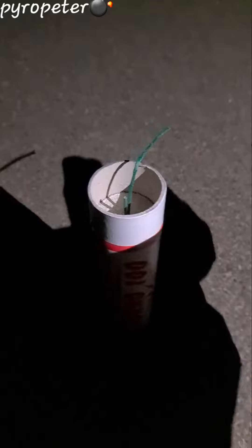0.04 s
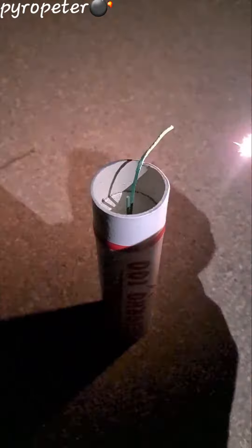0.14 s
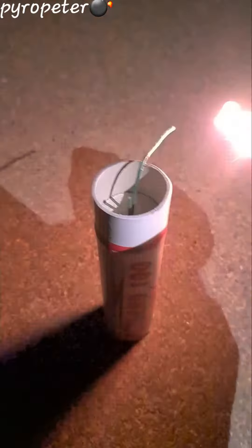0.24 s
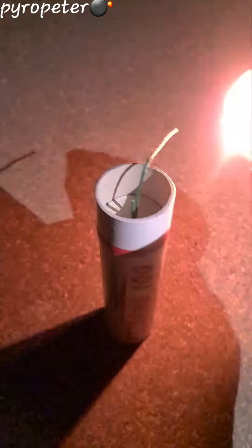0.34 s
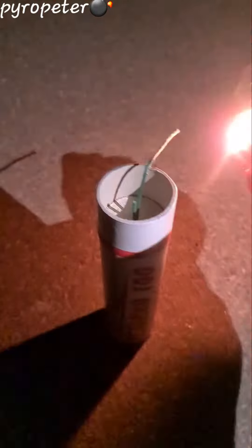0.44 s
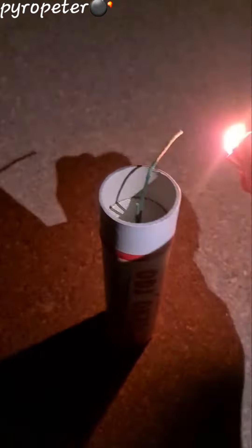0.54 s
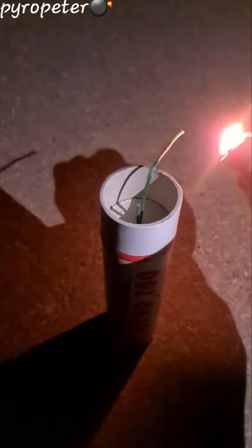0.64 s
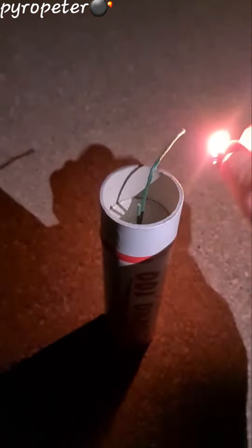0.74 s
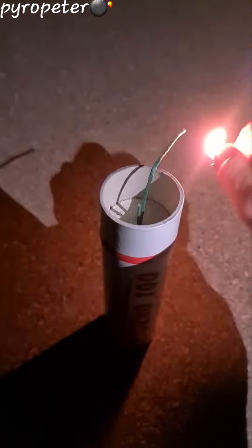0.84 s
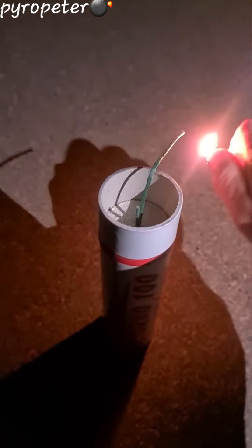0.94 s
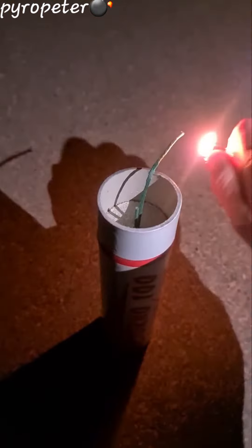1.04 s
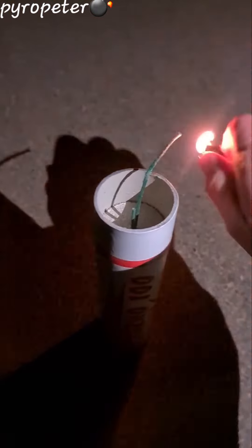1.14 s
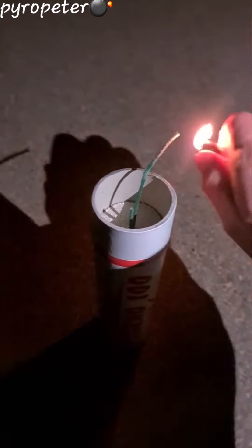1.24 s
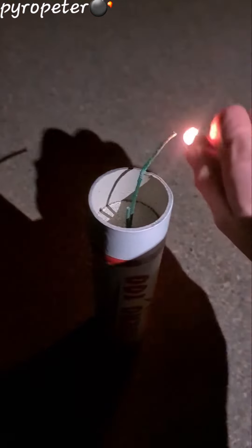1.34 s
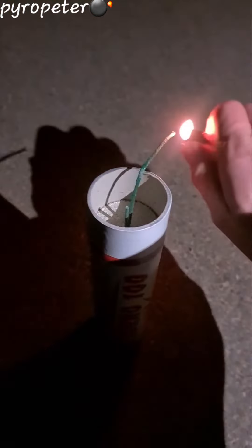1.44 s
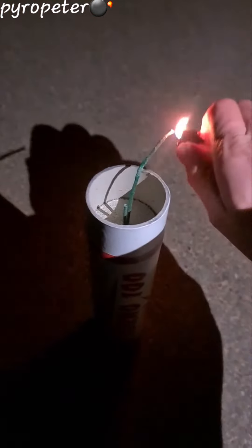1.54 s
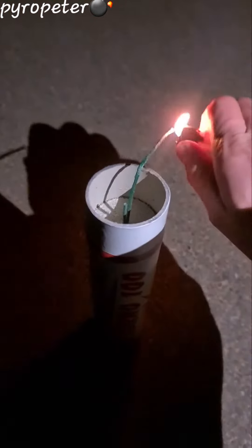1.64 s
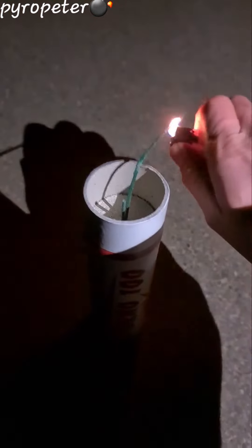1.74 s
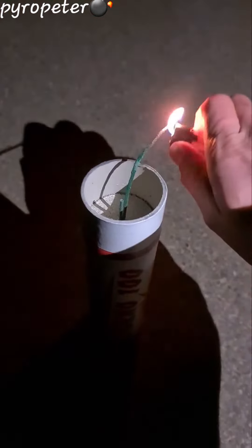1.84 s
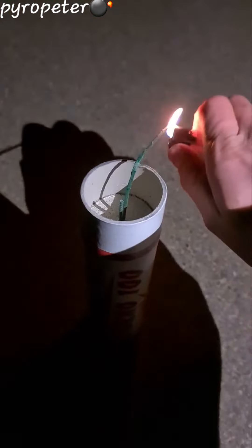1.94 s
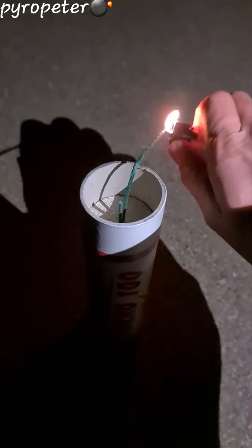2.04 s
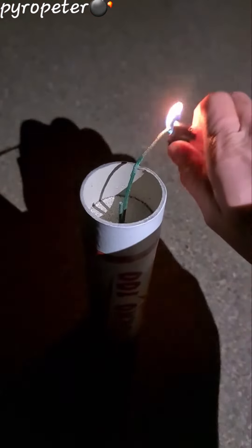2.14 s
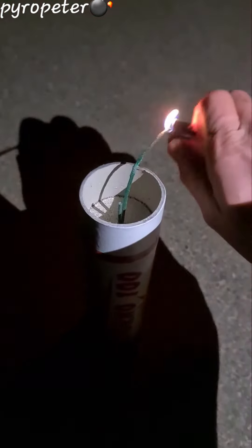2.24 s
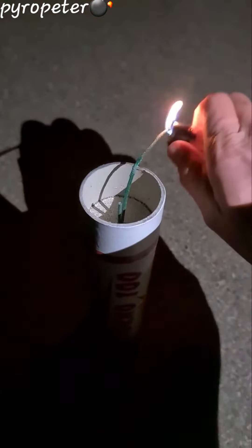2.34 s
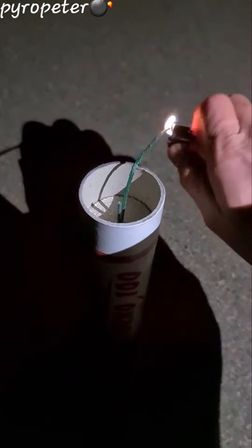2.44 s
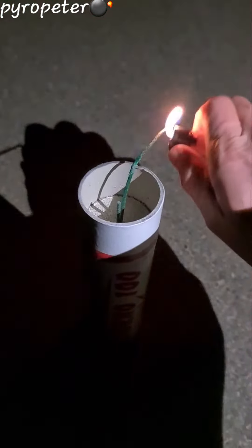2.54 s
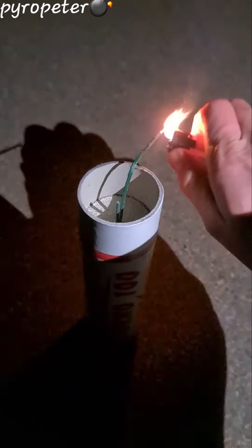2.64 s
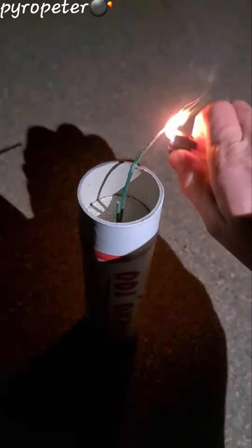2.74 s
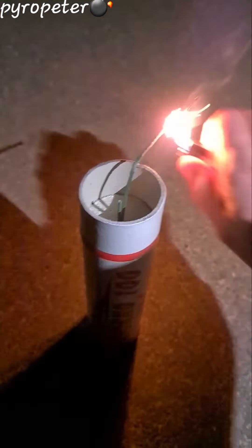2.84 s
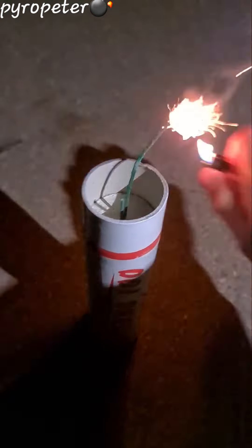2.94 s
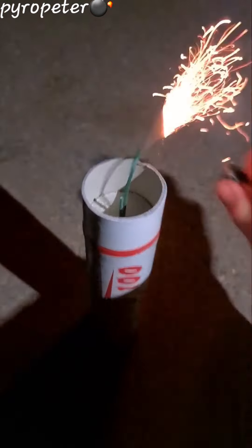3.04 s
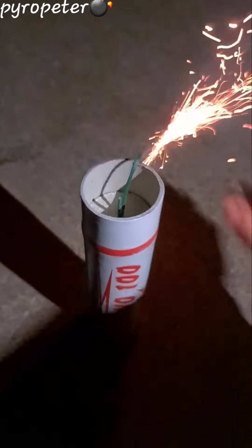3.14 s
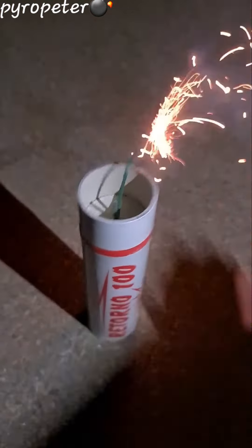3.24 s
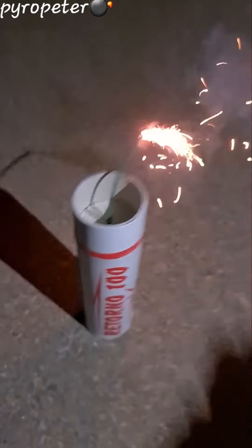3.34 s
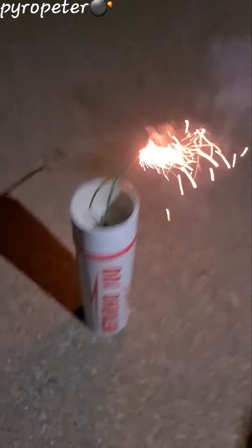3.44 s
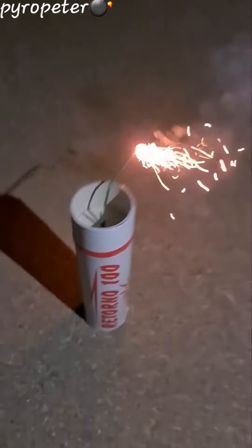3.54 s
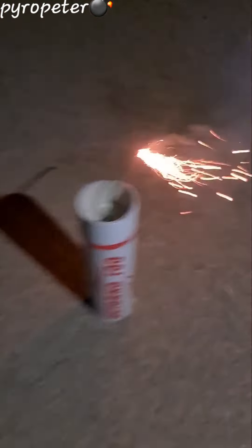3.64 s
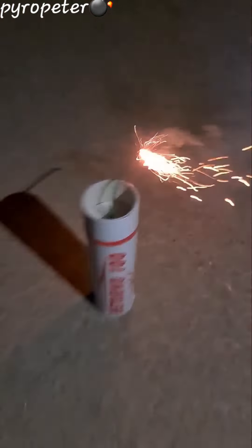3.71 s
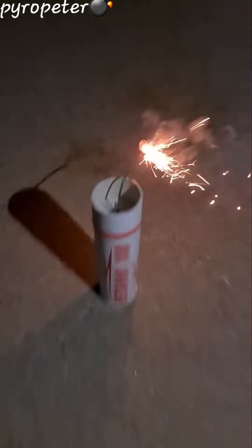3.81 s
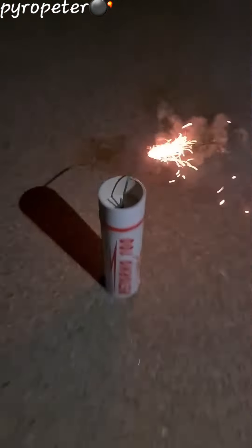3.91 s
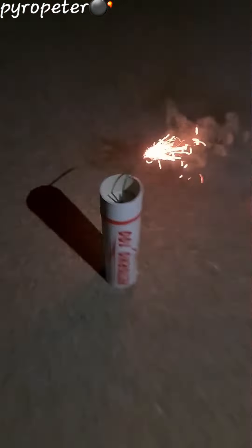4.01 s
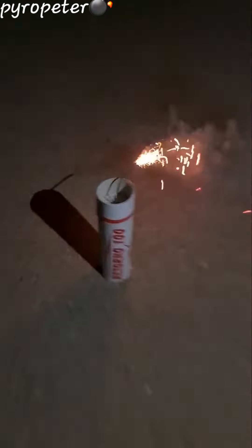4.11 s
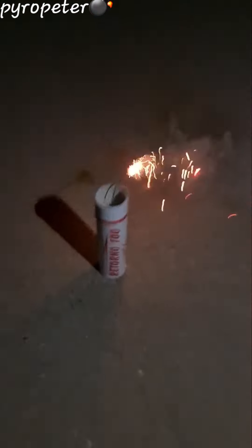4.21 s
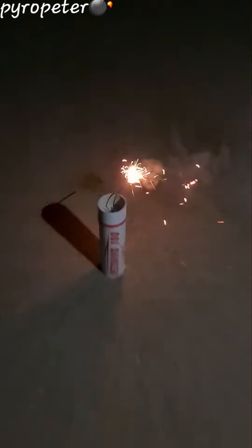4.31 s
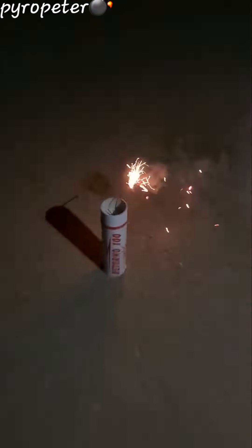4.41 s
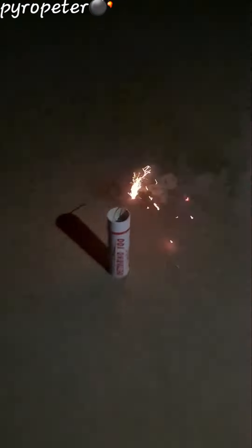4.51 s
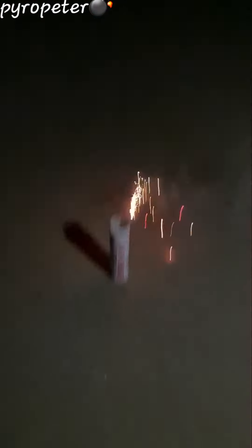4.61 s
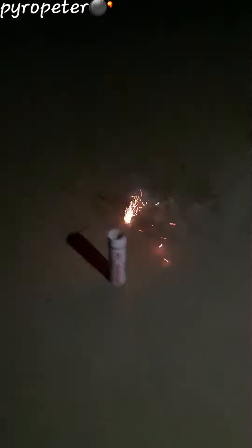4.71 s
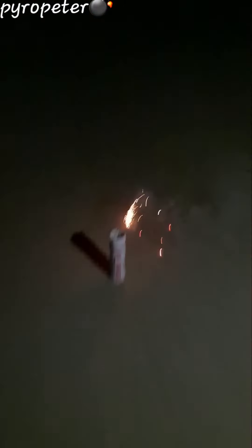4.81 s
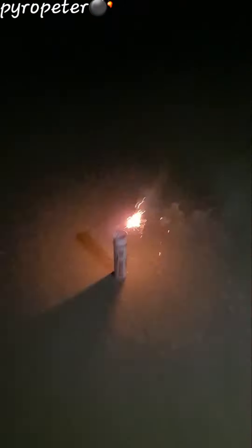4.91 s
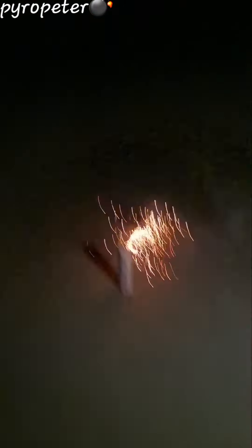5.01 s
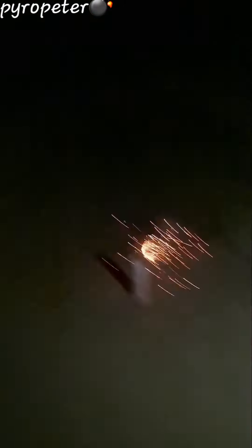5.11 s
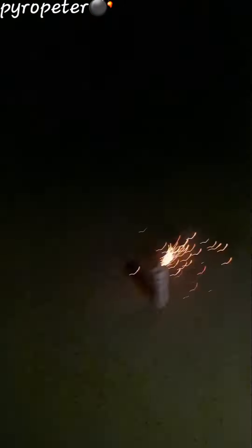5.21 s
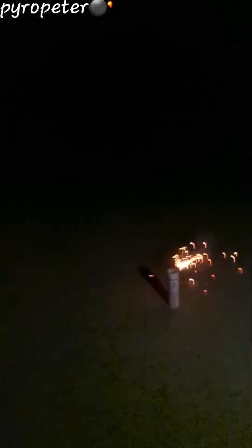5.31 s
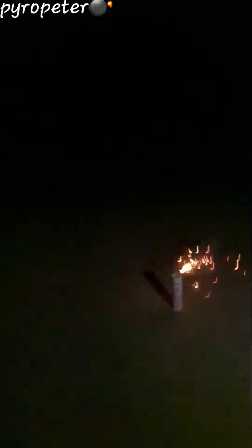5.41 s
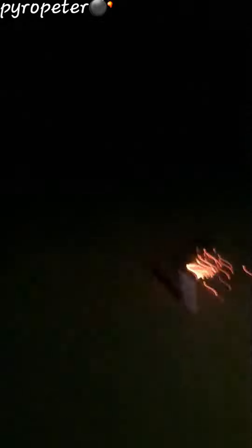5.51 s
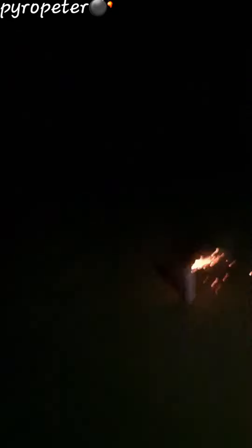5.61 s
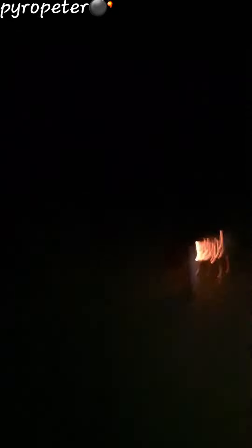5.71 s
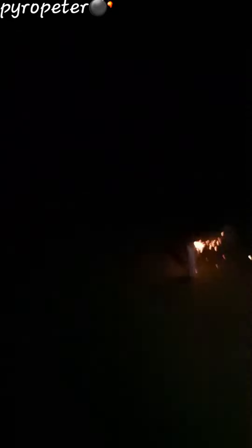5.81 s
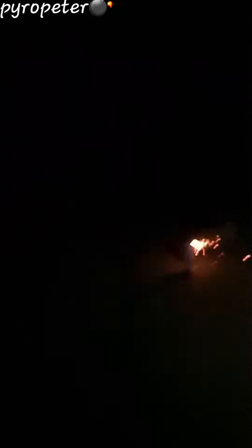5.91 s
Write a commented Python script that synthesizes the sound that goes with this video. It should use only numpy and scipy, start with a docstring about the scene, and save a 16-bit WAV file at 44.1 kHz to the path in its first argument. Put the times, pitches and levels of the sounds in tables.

```python
"""Outdoors at night a lighter is struck and held to a fuse, which catches, flares and hisses while the
listener backs away: fingers knock the hand-held microphone, shoes scuff, an engine idles far off.
Fuse, lighter, handling and steps are shaped noise, knocks are damped rings, the engine is a sum of sines.
Playback speeds up steadily, so the engine's pitch and the top edge of the sound climb."""
import sys
import numpy as np
from scipy import signal
from scipy.fft import rfft, irfft
from scipy.io import wavfile
from scipy.ndimage import uniform_filter1d

SR = 44100
rng = np.random.default_rng(int(sys.argv[2]) if len(sys.argv) > 2 else 0)


def to_wav(sig):
    """Store sig (one row per channel, or 1-D mono) as 16-bit WAV at the path in sys.argv[1].

    Samples outside -1..1 are clipped; the rate is SR.
    """
    pcm = np.clip(np.atleast_2d(sig), -1, 1) * 32767
    pcm = np.round(pcm).astype(np.int16)
    wavfile.write(sys.argv[1], SR, pcm.T)  # frames by channels


def amplitude_ratio(level_db):
    """Convert a level in decibels to the matching linear amplitude (field) ratio."""
    exponent = np.asarray(level_db, float) / 20
    return 10 ** exponent


N = 262953

# upper edge of the sound, climbing with playback speed: start_s, edge_hz
PLAYBACK_EDGE = [(0, 9760), (.8, 10060), (1.6, 10620), (2.4, 11240), (3.2, 11800), (4.0, 12420),
                 (4.8, 12760), (5.96, 13060)]


def rms_one(x):
    """Scales to unit power."""
    return x / np.sqrt(np.mean(x ** 2) + 1e-20)


def in_time(rows):
    """Each column of a curve table at every sample."""
    s, *columns = np.transpose(rows)
    return [np.interp(np.arange(N) / SR, s, column) for column in columns]


def drift(corner_hz):
    """Slow chance: noise low-passed twice at a fortieth of the sample rate, spread 1."""
    pole = np.exp(-2 * np.pi * corner_hz * 40 / SR)
    noise = rng.standard_normal(N // 40 + 2002)
    slow = signal.lfilter([1], [1, -2 * pole, pole * pole], noise)[2000:]
    return np.interp(np.arange(N) / 40, np.arange(len(slow)), rms_one(slow))


def coloured(x, spectrum):
    """Gives a broadband excitation the spectrum of a table; rms 1."""
    hz, db = np.transpose(spectrum)
    bins_hz = np.arange(N // 2 + 1) * SR / N + 1
    gain = amplitude_ratio(np.interp(np.log(bins_hz), np.log(hz), db))
    return rms_one(irfft(rfft(x) * gain, N))


def band(x, low_hz, high_hz):
    """Gentle band-pass."""
    edges = np.clip([low_hz, high_hz], 20, SR / 2.1)
    return signal.sosfilt(signal.butter(2, edges, "band", fs=SR, output="sos"), x)


def reshaped(x, gain):
    """Short-time spectra times gain(Hz, s)."""
    size = 1024
    overlap = size * 3 // 4
    hz, s, frames = signal.stft(x, SR, nperseg=size, noverlap=overlap)
    return signal.istft(frames * gain(hz[:, None], s), SR, nperseg=size, noverlap=overlap)[1][:N]


def swell(s, rise_s, t60_s):
    """Exponential rise to a peak at s = 0, then decay by 60 dB in t60_s."""
    rising = np.exp(np.minimum(s, 0) / rise_s)
    falling = amplitude_ratio(-60 * np.maximum(s, 0) / t60_s)
    return np.where(s < 0, rising, falling)


def grit(rows, grain_db):
    """Grainy noise in a band that swells to its peak and dies.

    Rows hold peak_s, level_db, centre_hz, width_octaves, rise_s, t60_s."""
    half = SR // 3
    out, t = np.zeros(N + 2 * half), np.arange(-half, half) / SR
    for peak_s, db, hz, octaves, rise_s, t60_s in rows:
        grains = np.repeat(rng.standard_normal(half // 20 + 1), 40)[:2 * half]
        noise = rng.standard_normal(2 * half) * amplitude_ratio(grain_db * grains)
        edges = hz * 2 ** (-octaves / 2), hz * 2 ** (octaves / 2)
        noise = rms_one(band(band(noise, *edges), *edges))
        at = round(peak_s * SR)
        out[at:at + 2 * half] += amplitude_ratio(db) * swell(t, rise_s, t60_s) * noise
    return out[half:half + N]


def fuse(sparks_per_s=2500, spread_db=4.0, sputter_db=0.62, spark_share=0.21):
    """A gas jet sputters and powder grains spit: hiss mixed with random clicks of either sign."""
    # burning fuse, a first spurt, a lull, the flare and the long burn: start_s, level_db
    burn = [(2.895, -63), (2.909, -43.5), (2.96, -43), (2.997, -40.5), (3.01, -48), (3.033, -57),
            (3.038, -43), (3.055, -51.5), (3.062, -62), (3.11, -52), (3.116, -42.5), (3.2, -34.5),
            (3.265, -31), (3.316, -22), (3.34, -27), (3.45, -31.5), (3.75, -34), (3.88, -31.5), (4.05, -35),
            (4.16, -36), (4.21, -32), (4.27, -34.5), (4.4, -33.5), (4.55, -36), (5.1, -40), (5.26, -37.5),
            (5.45, -40.5), (5.8, -43.5), (5.96, -41)]
    sizes = amplitude_ratio(spread_db * np.minimum(rng.exponential(1, N), 5)) * rng.choice([-1, 1], N)
    chance = sparks_per_s * amplitude_ratio(4 * drift(15.0)) / SR
    sparks = rms_one(sizes * (rng.random(N) < chance))
    jet = rms_one(rng.standard_normal(N) + spark_share * sparks)
    lit = np.arange(N) > burn[0][0] * SR
    return lit * amplitude_ratio(in_time(burn)[0] + sputter_db * drift(39.0)) * reshaped(jet, fuse_colour)


def fuse_colour(hz, s, flicker=0.11, patchy_db=2.0):
    """Jet colour and tube rings, blended by distance and heard thinner near 6 kHz; equal power per frame."""
    # relative colour of the jet: pitch_hz, near_db, far_db
    jet_colour = [(200, -39, -44), (438, -11.5, -12.5), (690, -10, 0), (1300, -15, -6.5), (1620, -2.5, -8),
                  (3000, -9, -10), (4280, -11, -12), (6230, -11, -13), (8180, -7.5, -10), (9600, -10, -9.5),
                  (11860, -22, -12), (14200, -22.5, -16)]
    # the paper tube below rings along: pitch_hz, width_hz, near_lift_db, far_lift_db
    tube_rings = [(710, 220, 7, 5), (1290, 200, -5, -1), (1790, 120, 9, 2), (2100, 80, 7, 4),
                  (2460, 130, 9, 11), (3050, 100, 4, 4), (3700, 140, 10, 11), (4750, 200, 4, 1),
                  (5200, 150, 4, 1), (7630, 150, 5, 3), (9310, 180, 6, 3)]
    # the rings change: start_s, pitch ratio of all but the lowest, strength of all (0-1)
    ring_drift = [(3.7, 1., 1.), (4.0, 1.04, 1.), (4.25, 1.07, 1.), (4.5, 1.1, .9), (4.8, 1.14, .4),
                  (5.3, 1.16, .2)]
    # the fuse's treble, in full from 8 kHz: start_s, lift_db
    treble = [(2.9, -8.5), (3.12, -4), (3.2, 4.5), (3.6, 2.5), (3.85, 0.5), (4.05, 4), (4.4, 0), (4.55, 3),
              (5.0, -1.3), (5.96, -2.5)]
    # the low roar against the hiss, in full below 1 kHz: start_s, lift_db
    roar = [(2.91, 1), (3.0, -3), (3.15, -2), (3.3, 2), (3.7, 1.9), (4.2, 2), (4.35, -3.3), (4.7, 3),
            (4.95, -6.5), (5.2, 0.5), (5.96, -8)]
    # one hears the band near 6 kHz thinned, more so around these times: centre_s, extra_db
    thinner_moments = [(4.13, -5), (4.8, -5)]
    thinned_db, moment_width_s = -3, 0.12
    retreat_start_s, retreat_s = 2.89, 1.36   # stepping back, from near colour to far colour
    flare_s, flare_width_s = 3.31, 0.062      # the flare has the near colour

    retreat = np.clip((s - retreat_start_s) / retreat_s, 0, 1) ** 0.89
    far = retreat * (1 - np.exp(-((s - flare_s) / flare_width_s) ** 2))
    at_hz, near_db, far_db = np.transpose(jet_colour)
    db = (1 - far) * np.interp(hz, at_hz, near_db) + far * np.interp(hz, at_hz, far_db)
    db = db + np.interp(s, *np.transpose(treble)) * np.interp(hz, [4000, 8000], [0, 1])
    db = db + np.interp(s, *np.transpose(roar)) * np.interp(hz, [1000, 1400], [1, 0])

    extra_db = sum(moment_db * np.exp(-((s - centre_s) / moment_width_s) ** 2)
                   for centre_s, moment_db in thinner_moments)
    db = db + (thinned_db + extra_db) * np.interp(hz, [4000, 5400, 6800, 7600], [0, 1, 1, 0])

    # clumps of powder burn unevenly
    clumps = uniform_filter1d(rng.standard_normal(db.shape), size=14, axis=0)
    clumps = uniform_filter1d(clumps, size=8, axis=1)
    db = db + patchy_db * rms_one(clumps)

    times, ratio, strength = np.transpose(ring_drift)
    ratio, strength = np.interp(s, times, ratio), np.interp(s, times, strength)
    frames = np.minimum(s * SR, N - 1).astype(int)
    for k, (ring_hz, width_hz, near_lift, far_lift) in enumerate(tube_rings):
        centre_hz = ring_hz * (ratio if k else 1)   # the lowest ring stays put
        waver = 1 + flicker * drift(12.4)[frames]   # the jet wags past the mouth
        lift_db = waver * strength * ((1 - far) * near_lift + far * far_lift)
        db = db + lift_db / (1 + (2 * (hz - centre_hz) / width_hz) ** 2)
    return amplitude_ratio(db) / np.sqrt(np.mean(amplitude_ratio(2 * db), axis=0))


def lighter():
    """Wheel scrapes flint and the lever snaps: bursts coloured by the small metal parts."""
    # bursts of the strike: peak_s, level_db (rms at the peak), t60_s
    bursts = [(.448, -51.5, 0.25), (.503, -40, 0.18), (.519, -45, .086), (.558, -29.5, 0.066),
              (.566, -18.5, 0.035), (.573, -32.5, .033), (.59, -48, 0.13)]
    # relative colour of the metal parts: pitch_hz, level_db
    metal_colour = [(290, -46), (500, -17.5), (691, -10.5), (876, -21), (1290, -12), (1920, 3.5),
                    (2370, -15), (2680, 5), (3850, -13), (4590, -6.5), (5670, -9), (8340, -6), (9800, -19),
                    (12700, -51), (21600, -120)]
    s = np.arange(N) / SR
    envelope = sum(amplitude_ratio(db) * swell(s - peak_s, 0.0051, t60_s) for peak_s, db, t60_s in bursts)
    scrape = rng.standard_normal(N) * amplitude_ratio(1.3 * drift(120.0))      # teeth bite the flint unevenly
    # level treble in place of the two steep last rows
    return envelope * coloured(scrape, metal_colour[:-2] + [(15000, -18.5)])


def ticks():
    """Small ticks of the lighter in the hand and the first sparks: very short noise bursts."""
    # peak_s, level_db (rms at the peak), centre_hz, width_octaves
    tick_rows = [(.377, -54, 900, 1.7), (.619, -45, 3000, 4.7), (.662, -44, 6000, 2.4),
                 (.672, -52, 5000, 2.3), (.722, -39, 8000, 3.9), (.91, -55, 2500, 1.5),
                 (1.136, -49, 1180, 1.8), (1.604, -46, 1300, 3.1), (1.676, -50, 1880, 0.94),
                 (1.754, -55, 1630, 0.45), (1.81, -45, 1400, 2.5), (1.823, -48, 2770, 0.79),
                 (1.909, -48.5, 1190, 3.1), (2.868, -42.5, 3470, 2.7), (3.022, -42, 3000, 3),
                 (3.078, -49, 4000, 2.7)]
    rise_s, t60_s = 0.00059, 0.02
    return grit([(*row, rise_s, t60_s) for row in tick_rows], grain_db=0.5)


def knocks(offset_s=0.00354, snap=1.0):
    """Each finger knock pushes the casing either way; it rings a few cycles with a sharper onset."""
    # start_s (counted from offset_s into the sound), peak_db (before the band-pass), pitch_hz
    knock_rows = [(0.118, -28.5, 355), (0.218, -50, 352), (0.274, -25, 393), (0.373, -34.5, 330),
                  (0.423, -37.5, 291), (0.623, -38.5, 153), (0.649, -36, 497), (1.673, -41, 427),
                  (3.596, -32, 224), (3.685, -13.5, 254), (3.797, -37, 234), (3.979, -28.5, 198),
                  (4.465, -28, 278.5), (4.505, -28, 252), (4.584, -22.5, 247), (4.725, -13.5, 204),
                  (4.804, -24, 264), (4.865, -19, 296), (5.142, -18, 215), (5.159, -26, 242),
                  (5.182, -21, 258), (5.221, -25, 282), (5.259, -19, 149), (5.289, -23, 157),
                  (5.37, -25.5, 159), (5.421, -12, 254), (5.434, -9, 382)]
    t60_cycles = 3.38   # for a knock at 250 Hz and -29 dB
    damping, pitch_damping = 0.23, 0.29   # harder and higher knocks die sooner: dB per dB, power of pitch
    out, t = np.zeros(N + SR // 5), np.arange(SR // 10) / SR
    signs = rng.choice([-1, 1], len(knock_rows))
    for (start_s, db, hz), sign in zip(knock_rows, signs):
        haste = amplitude_ratio(damping * (db + 29)) * (hz / 250) ** pitch_damping
        ring = np.sin(2 * np.pi * hz * t) * t * amplitude_ratio(-60 * t * hz / t60_cycles * haste)
        slope = np.gradient(ring) * SR / (2 * np.pi * hz)
        ring = ring + snap * slope * amplitude_ratio(-60 * t / 0.034)
        at = round((start_s + offset_s) * SR)
        out[at:at + len(t)] += sign * amplitude_ratio(db) * ring / np.abs(ring).max()
    return band(out[:N], 82, 6000)


def rumble(lumpy_db=4.5, fade_db_per_s=200):
    """Skin and cloth slide on the casing in lumps: low noise with a wavering level."""
    # hand and sleeve moving on the microphone: start_s, end_s, start_db, end_db
    slides = [(-.1, 0.28, -55, -54), (0.607, .72, -58, -66), (3.22, 5.0, -47, -46.5),
              (5.0, 5.85, -50.5, -48), (5.853, 6.1, -44, -32)]
    s = np.arange(N) / SR
    levels = []
    for start, end, first_db, last_db in slides:
        outside_s = np.maximum(np.maximum(start - s, s - end), 0)
        levels.append(np.interp(s, [start, end], [first_db, last_db]) - fade_db_per_s * outside_s)
    noise = rms_one(band(rng.standard_normal(N), 60, 455))
    return amplitude_ratio(np.max(levels, axis=0) + lumpy_db * drift(36.0)) * noise


def scuffs():
    """Shoes scuff the ground: sudden grainy noise bursts."""
    # peak_s, level_db (rms at the peak), centre_hz, width_octaves, t60_s
    scuff_rows = [(4.172, -39, 3000, 1.5, 0.027), (5.126, -39.5, 2500, 1.3, .04),
                  (5.212, -37.5, 2700, 0.65, 0.026), (5.267, -20.5, 9000, 0.85, 0.19),
                  (5.268, -21.5, 1300, 3.87, 0.2), (5.436, -34, 1730, 2.5, 0.027),
                  (5.56, -34.5, 5000, 7.9, .041), (5.625, -33, 1840, 2.3, 0.048),
                  (5.741, -34.5, 2240, 1.84, 0.11), (5.753, -34, 11300, 0.63, .025),
                  (5.833, -36, 9100, 0.53, .04), (5.843, -33.5, 9000, .6, 0.082),
                  (5.92, -23.5, 1130, 1.34, 0.057), (5.922, -30.5, 5000, 4.9, 0.034)]
    rise_s = 0.003
    return grit([(*row, rise_s, t60_s) for *row, t60_s in scuff_rows], grain_db=3.5)


def step_bodies():
    """Softer low bodies of steps and thumps, and two thin high squeaks: bands that swell more slowly."""
    # peak_s, level_db (rms at the peak), centre_hz, width_octaves, t60_s
    body_rows = [(1.845, -54, 447, 2.3, 0.11), (5.274, -24, 152, 1.54, 0.15), (5.43, -28, 288, 3.4, 0.15),
                 (5.695, -43.5, 12500, 0.036, .25), (5.72, -27, 840, 0.68, 0.067),
                 (5.742, -13.5, 790, 1.62, 0.056), (5.767, -31, 980, 0.68, 0.038),
                 (5.803, -48, 12500, .04, .1), (5.82, -53, 240, 0.92, .24), (5.895, -34.5, 520, 2.6, 0.13),
                 (5.945, -37, 686, 1.6, 0.064)]
    rise_share = 0.16   # rise time as a share of t60
    return grit([(*row, rise_share * t60_s, t60_s) for *row, t60_s in body_rows], grain_db=2.5)


def buffet(rise_db_per_s=110, fall_db_per_s=135):
    """Air buffets the microphone during the retreat: very low lumpy noise."""
    # peak_s, level_db
    gusts = [(4.03, -43), (4.66, -41), (4.938, -35), (5.09, -33), (5.272, -29), (5.414, -30), (5.736, -32)]
    noise = rms_one(band(rng.standard_normal(N), 26, 55.6))
    s = np.arange(N) / SR
    levels = [peak_db - np.maximum(rise_db_per_s * (peak_s - s), fall_db_per_s * (s - peak_s))
              for peak_s, peak_db in gusts]
    return amplitude_ratio(np.max(levels, axis=0)) * noise


def engine(waver_db=1.5):
    """Low orders of the firing cycle as sines, each wavering on its own; pitch follows playback speed."""
    # base level, to which each order's own is added: start_s, level_db
    idle_level = [(0, -57), (.9, -54.5), (2, -54), (3.2, -53), (4.5, -51), (5.1, -49), (5.96, -52)]
    # multiple of the cycle rate, level_db against the base level
    orders = [(1, -12), (2, 0.5), (3, 4), (4, -11), (5, -16.5), (6, -20), (8, -16.5)]
    idle_hz = 15.5   # cycle rate when playback starts
    hz = idle_hz * in_time(PLAYBACK_EDGE)[0] / PLAYBACK_EDGE[0][1]
    turn = 2 * np.pi * np.cumsum(hz) / SR
    tone = sum(amplitude_ratio(db + waver_db * drift(4.6)) * np.cos(k * (turn - .6)) for k, db in orders)
    return np.sqrt(2) * amplitude_ratio(in_time(idle_level)[0]) * tone


def night_air(traffic_db=-56.0):
    """Smooth far hiss with a wavering level over a steady low traffic drone."""
    # hiss, which swells as the lighter is struck and then sinks: start_s, level_db
    hiss_level = [(0.0, -52), (0.43, -51.5), (0.58, -43.5), (0.77, -55), (1.29, -59), (2.84, -60.5)]
    # relative colour of the night air: pitch_hz, level_db
    air_colour = [(20, -6.5), (40, 7), (70, -3), (110, -17.5), (260, -19), (450, -21), (760, -24),
                  (1300, -29.5), (1620, -27.5), (2000, -29), (4500, -36.5), (7000, -34), (10000, -39.5),
                  (15000, -41)]
    # the two lowest rows give way to a soft bottom; the drone fills that range
    hiss = coloured(rng.standard_normal(N), [(40, -47)] + air_colour[2:])
    drone = rms_one(band(rng.standard_normal(N), air_colour[0][0], air_colour[2][0]))
    return amplitude_ratio(in_time(hiss_level)[0] + 1.88 * drift(16.4)) * hiss + amplitude_ratio(traffic_db) * drone


def scene():
    """All sources reach one microphone."""
    flame = fuse() + lighter() + ticks()
    hand = knocks() + rumble() + buffet()
    steps = scuffs() + step_bodies()
    mono = flame + hand + steps + engine() + night_air()
    return np.array([mono, mono])


def band_limit(x):
    """A steep low-pass at the top of the band."""
    return signal.sosfilt(signal.butter(12, 15310, fs=SR, output="sos"), x)


def record(dry):
    """The speed change leaves a silent gap above the climbing edge; a band returns above the gap."""
    def kept(hz, s):
        """Below the edge, and the upper band, where a mirrored band would lie, up to the top cut."""
        edge_hz = np.interp(s, *np.transpose(PLAYBACK_EDGE))
        above_gap = (hz > 1.192 * edge_hz) & (hz < 14600)
        return (hz < edge_hz) | above_gap
    mono = reshaped(dry[0], kept)
    return band_limit(np.array([mono, mono]))


dry = scene()
out = record(dry)
to_wav(out)
```